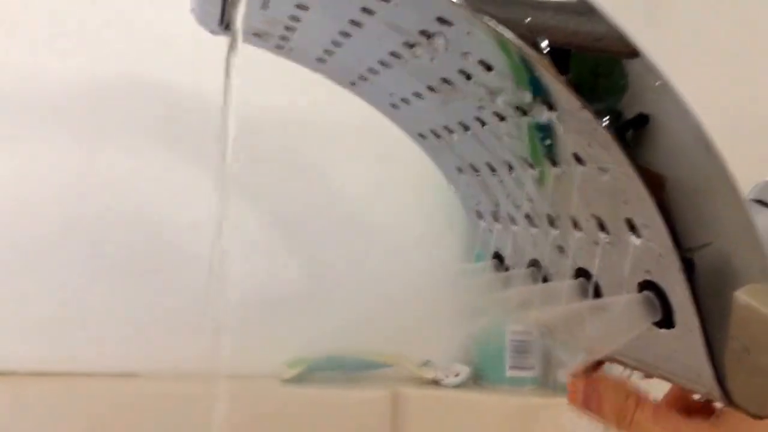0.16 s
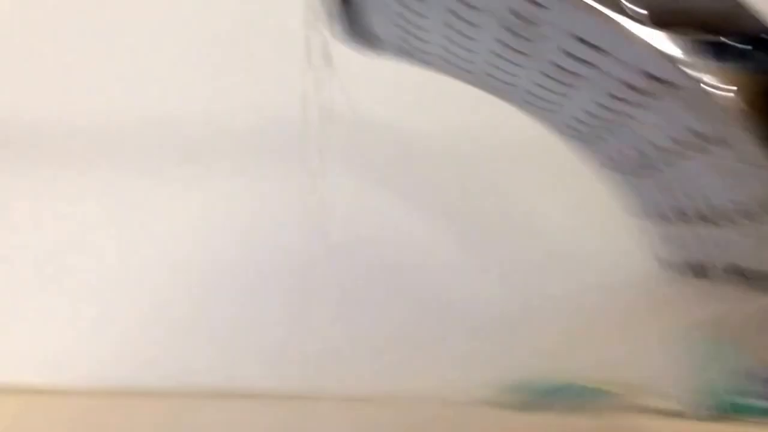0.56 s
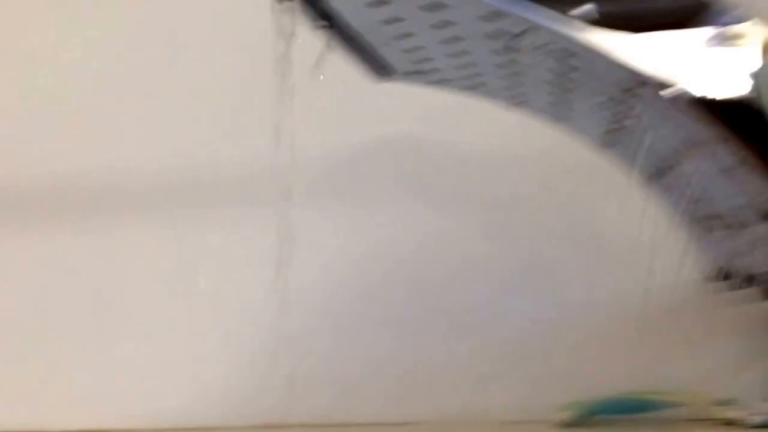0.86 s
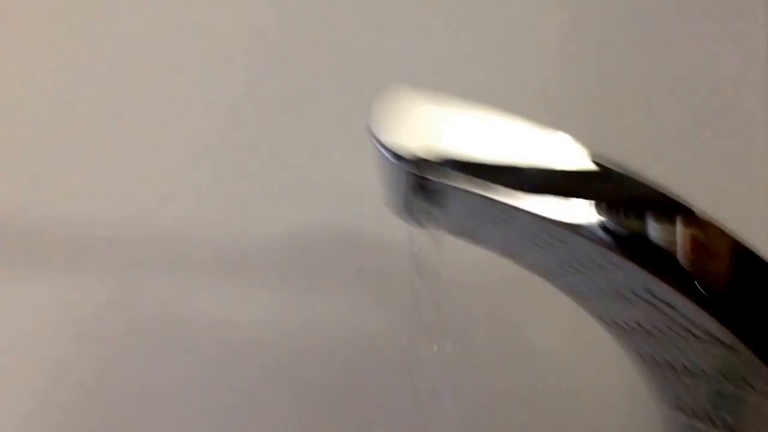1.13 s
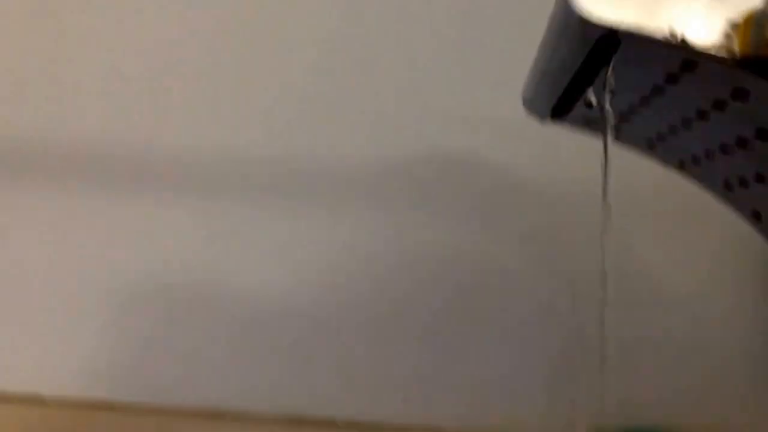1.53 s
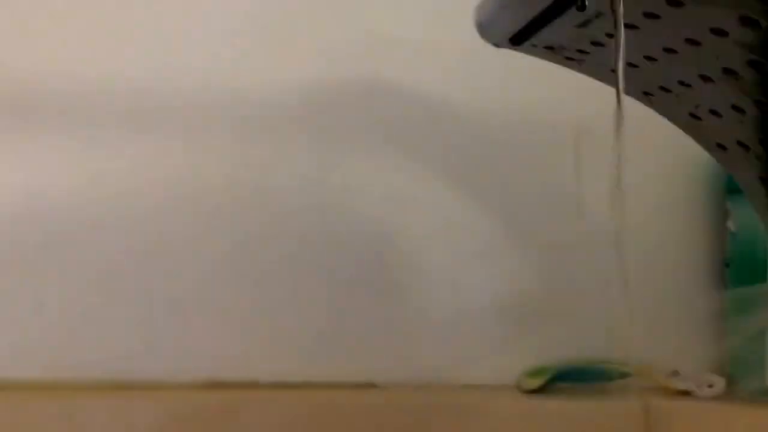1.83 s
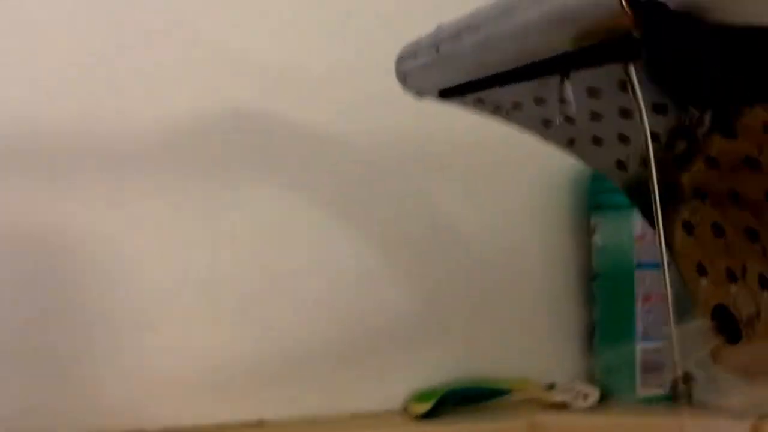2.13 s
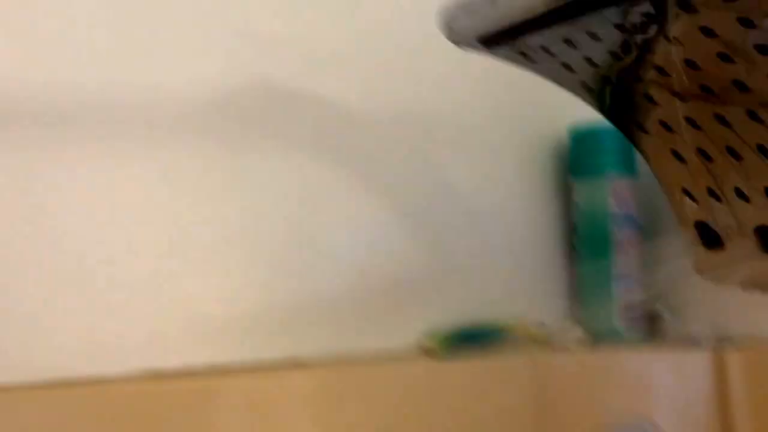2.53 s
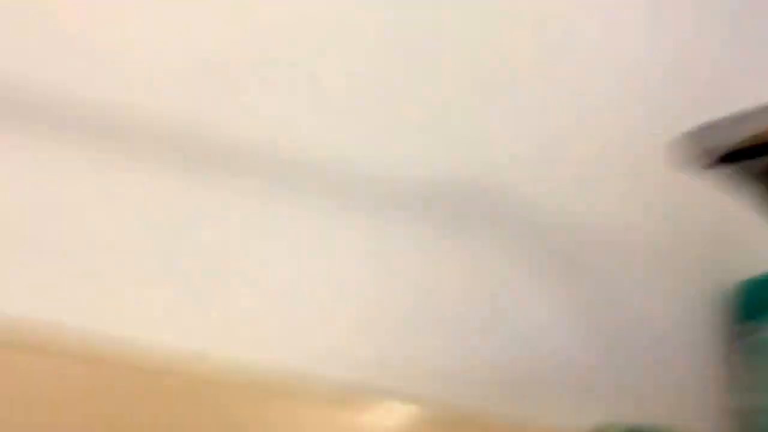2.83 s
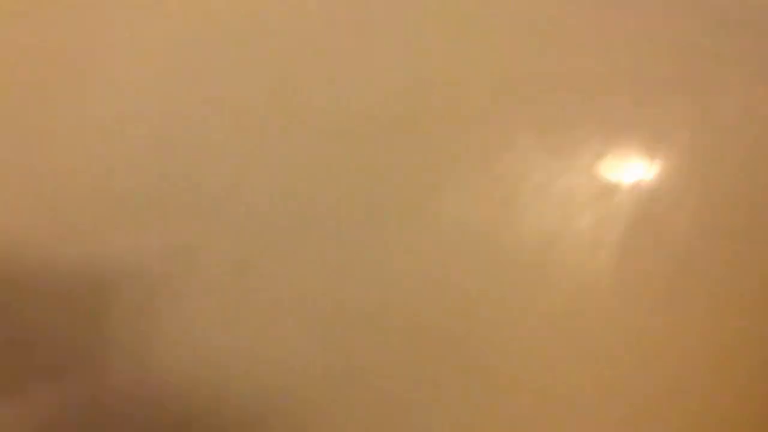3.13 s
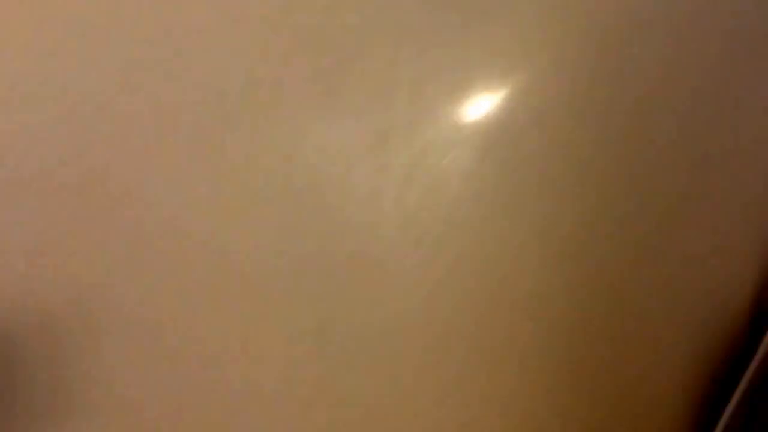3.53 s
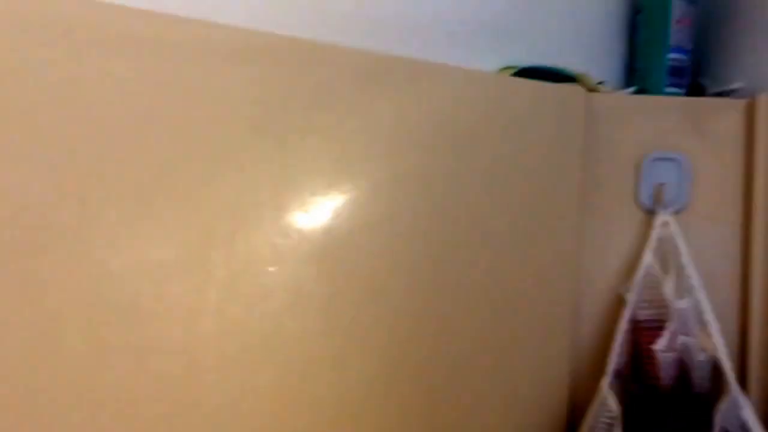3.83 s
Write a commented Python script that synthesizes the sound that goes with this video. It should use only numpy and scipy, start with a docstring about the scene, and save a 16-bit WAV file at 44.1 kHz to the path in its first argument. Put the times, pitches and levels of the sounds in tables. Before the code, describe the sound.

A shower sprays in a small tiled bathroom, hissing and pattering on a low drumming tub. Drops tick close by at first. The hiss shifts and gains a hollow whistle as the microphone moves, with a few soft handling bumps.

```python
"""A shower sprays in a small tiled bathroom: its jets sizzle and hiss, and the spray patters on the tub,
which drums low. At the start a few drops tick close by. The camera swings past the shower head, so the
sizzle changes colour, and after a second the hand bumps the camera softly twice. By two seconds a hollow
whistle has come out. Then more drops tick, the sizzle sinks as the camera swings away, the tub drums on
other notes, and two more soft bumps follow."""
import sys
import numpy as np
from scipy.fft import rfft, irfft, next_fast_len
from scipy.io import wavfile
from scipy.ndimage import map_coordinates

SR = 44100
rng = np.random.default_rng(int(sys.argv[2]) if len(sys.argv) > 2 else 0)


def store_pcm(level_fs):
    """Save levels as 16-bit WAV."""
    pcm = np.round(np.clip(level_fs, -1, 1) * 32767).astype(np.int16)
    wavfile.write(sys.argv[1], SR, np.atleast_2d(pcm).T)


N = 175518

# tone of the hiss near 9 kHz, in the jets and the close drops (frequency [Hz], relative level [dB])
HISS_TONE = [(5000, -35), (6800, -9), (7700, -3), (8600, 1), (9200, -0.5), (9900, -5.5), (11000, -2),
             (13500, -35)]


def amp(db):
    """Turn decibels into a gain."""
    return 10 ** (np.asarray(db) / 20)


def unit(x):
    """Scale a sound to an average (rms) size of 1."""
    return x / np.sqrt(np.mean(x ** 2) + 1e-20)


def curve(rows):
    """Join (time [s], value) points with straight lines, one value per sample."""
    return np.interp(np.arange(N) / SR, *np.transpose(rows))


def wobble(rate):
    """A smooth curve through `rate` random values a second."""
    points = rng.standard_normal(int(N * rate / SR) + 4)
    return map_coordinates(points, [np.arange(N) * rate / SR])


def filtered(x, response):
    """Multiply each frequency f in a sound by response(f)."""
    size = next_fast_len(N + SR // 4)
    return irfft(rfft(x, size) * response(np.fft.rfftfreq(size, 1 / SR)), size)[:N]


def coloured(x, tone):
    """Shape a sound by (frequency [Hz], level [dB]) points, then scale it to size 1."""
    hz, db = np.transpose(tone)
    return unit(filtered(x, lambda f: amp(np.interp(np.log(f + 1), np.log(hz + 1), db))))


def resonance(f, hz, half_width):
    """How a thing that rings at hz answers frequency f; squaring or cubing narrows the peak."""
    damping = 2j * f * half_width
    return damping / (hz * hz - f * f + damping)


def droplets(per_s, scatter_db, wash_db):
    """Tiny hits of random size over a wash of countless smaller ones."""
    hits = (rng.random(N) < per_s / SR) * np.sign(rng.standard_normal(N))
    sizes = amp(scatter_db * np.clip(rng.standard_normal(N), -2, 2))
    return unit(unit(hits * sizes) + amp(wash_db) * rng.standard_normal(N))


def wall_echoes(x):
    """Eight weak wall echoes colour the sound; their delays drift as the microphone moves."""
    echo_gain, drift_s = 0.11, 0.0003
    out = x.copy()
    for delay_s in rng.uniform(0.002, 0.012, size=8):
        lag = SR * (delay_s + drift_s * wobble(1))
        out += echo_gain * map_coordinates(x, [np.arange(N) - lag])
    return out * x.std() / out.std()


def hand_bumps():
    """The hand knocks the camera: low thuds that swell and fade smoothly."""
    # each bump (middle time [s], level [dB], fade time on either side [s])
    bumps = [(1.08, -44, .018), (1.32, -39, 0.036), (2.292, -58, 0.012), (3.059, -44, 0.016),
             (3.771, -38, 0.011)]
    thud_hz, t = 82, np.arange(N) / SR
    return sum(amp(db) * np.exp(-((t - s) / fade) ** 2) * np.sin(2 * np.pi * thud_hz * (t - s))
               for s, db, fade in bumps)


def tub_drum():
    """The tub drums under the spray; as the aim shifts twice, other notes take over."""
    # the tub's notes (pitch [Hz], filter half-width [Hz], first level [dB], middle [dB], last [dB])
    notes = [(82, 28, -60, -58, -64), (118, 36, -51, -54, -59), (167.5, 31, -56, -68, -53),
             (228, 18.6, -56.5, -55.5, -49), (300.4, 17, -58, -66, -54), (364.7, 25, -55.5, -58.5, -58)]
    drum = np.zeros(N)
    for hz, half_width, first_db, mid_db, last_db in notes:
        note = unit(filtered(rng.standard_normal(N), lambda f: resonance(f, hz, half_width) ** 2))
        drum += note * amp(curve([(1.3, first_db), (2.4, mid_db), (2.93, mid_db), (3, last_db)]))
    return drum


def hollow_whistle():
    """A narrow band of noise at the low end of the sizzle comes out as the shower head turns."""
    # how the whistle grows (time [s], level [dB])
    level = [(0, -64), (.6, -60), (1.1, -52), (1.8, -51), (2.15, -44.5), (2.8, -44), (3.3, -44.5),
             (3.98, -42.5)]
    ring = filtered(rng.standard_normal(N), lambda f: resonance(f, hz=3127, half_width=195) ** 3)
    return unit(ring) * amp(curve(level))


def patter():
    """The spray splashes on tub and wall and keeps the wall and fittings ringing."""
    # strength of the splash (time [s], level [dB]) and its tone (frequency [Hz], relative level [dB])
    level, splash_tone = [(0.0, -38.5), (0.12, -43), (1.07, -40.5), (1.92, -41.5), (2.26, -39.5),
                          (2.87, -40.5), (3.98, -41.5)], [(25, -32), (70, -0.5), (200, -4), (400, -2), (540, -4), (720, -3),
                                          (800, -6), (950, 1.5), (1080, -3), (1450, 1.5), (2300, 0),
                                          (2750, -2.5), (4000, -7.5), (9000, -27)]
    # notes of the wall and fittings (base pitch [Hz], filter half-width [Hz], relative level [dB])
    notes = [(713, 23, -7), (982.5, 33, -0.5), (1164.5, 37, 3.5), (1525, 94, -5), (1921, 150, 1)]
    # how their pitch moves with the spray (time [s], pitch [ratio])
    bend = [(0, 1.016), (1.1, 1), (1.6, 1.01), (2.3, 1.01), (3, 1.005), (3.98, 1.01)]
    # their strength next to the splash (time [s], relative level [dB])
    ring_level = [(0, -5), (1, -3.5), (1.6, -4), (2.2, -2), (2.9, -7), (3.98, -9)]
    splash = coloured(droplets(per_s=1200, scatter_db=3, wash_db=6), splash_tone)
    hits = droplets(per_s=900, scatter_db=8.5, wash_db=4)
    rings = filtered(hits, lambda f: sum(amp(db) * resonance(f, hz, half) ** 2 for hz, half, db in notes))
    rings = map_coordinates(rings, [np.cumsum(curve(bend))], mode="mirror")  # faster sounds higher
    return amp(curve(level)) * (splash + amp(curve(ring_level)) * unit(rings))


def near_drops():
    """Each drop close to the microphone gives a sharp tick and a brief spatter."""
    # each drop (time [s], peak level of its tick [dB])
    drops = [(.049, -4.5), (.079, -11), (.0985, -5), (.1645, -6), (0.18, -6), (0.181, -8.5), (0.189, -9),
             (0.2065, -9), (0.831, -7), (2.5874, -10), (2.588, -15), (2.59, -14), (2.6005, -17)]
    tick_hz, tick_decay_s = 9600, 0.000064
    spatter_db, spatter_decay_s = -16, 0.0043
    out, t = np.zeros(N + SR), np.arange(SR // 20) / SR
    hiss = coloured(rng.standard_normal(N), HISS_TONE)
    for time_s, db in drops:
        start = round(time_s * SR)
        span = slice(start, start + len(t))
        hz = tick_hz * np.exp(0.086 * rng.standard_normal())
        tick = np.cos(2 * np.pi * hz * t) * np.exp(-t / tick_decay_s)
        tick = np.diff(tick, prepend=0)  # thins out the bass
        spatter = amp(spatter_db) * hiss[span] * np.exp(-t / spatter_decay_s)
        out[span] += amp(db) * (tick / np.abs(tick).max() + spatter)
    return out[:N]


def jets():
    """The jets break into droplets; all bands flutter with the flow, and each a little by itself."""
    # how far the shower head has turned from the microphone (time [s], share [0-1])
    turning = [(0, 0.25), (.5, 0.06), (.9, .4), (1.5, 0.57), (2.1, 0.97), (2.7, .85), (3.3, 0.94),
               (3.98, 1)]
    # strength of the sizzle and the bands above it, low to high (time [s], relative level [dB])
    sizzle_level, edge_level, hiss_level = [(0, -31), (.42, -30.5), (1, -30.5), (1.3, -30), (2, -29.5),
                                            (2.45, -29), (2.72, -33), (3.1, -34.5), (3.35, -36),
                                            (3.65, -36), (3.98, -35.3)], [(0.0, -38.5), (0.65, -44), (0.85, -37),
                                                            (1.44, -43), (1.63, -34), (2.49, -34),
                                                            (2.8, -40), (2.9, -36), (3.6, -43), (3.76, -33),
                                                            (3.89, -38), (3.98, -35)], [(0.0, -28), (0.2, -31),
                                                                          (0.22, -30.5), (0.82, -29.5),
                                                                          (1.31, -32), (1.51, -29.5),
                                                                          (1.65, -36), (1.71, -33),
                                                                          (2.56, -40.5), (2.59, -36),
                                                                          (2.64, -40), (3.59, -37),
                                                                          (3.7, -48), (3.98, -48)]
    fizz_level, air_level = [(0.0, -31), (0.09, -30), (1.0, -29.5), (1.11, -32.5), (2.05, -30.5),
                             (2.36, -32.5), (2.57, -28.5), (2.83, -34), (3.6, -30), (3.98, -32.5)], [(0.0, -37), (0.02, -32), (0.49, -32), (0.68, -40), (2.58, -30.5),
                                           (2.64, -33.5), (3.23, -34.5), (3.47, -29.5), (3.98, -31.5)]
    # tone of the sizzle from the front and from behind (frequency [Hz], relative level [dB])
    front_tone, behind_tone = [(2900, -47), (3250, -18), (3500, -5.5), (3950, -1.5), (4500, 0),
                               (5100, -0.5), (5700, -4), (6700, -16.5), (8000, -22), (10000, -48)], [(2850, -43), (3050, -14), (3250, -3.5), (3600, -4.5),
                                                     (4200, -1.5), (4850, 1.5), (5400, -1), (6000, -6),
                                                     (7000, -10.5), (10000, -43)]
    # tone of the bands near 6, 12 and 14 kHz (frequency [Hz], relative level [dB])
    edge_tone, fizz_tone, air_tone = [(4900, -36), (5500, -3.5), (5950, 4.5), (6400, 0.5), (6850, -3),
                                      (7300, -8.5), (8500, -25)], [(7500, -19.5), (9800, -7), (11000, -4),
                                                             (12000, 1.5), (13100, -1), (14000, -8),
                                                             (15500, -20)], [(11000, -30),
                                                                                    (12800, -10),
                                                                                    (13800, 2), (14700, 2),
                                                                                    (15400, -1)]
    flutter_per_s, sizzle_db = 40, 0.73
    turn = np.clip(curve(turning), 0, 1)
    front = coloured(droplets(per_s=3000, scatter_db=2.5, wash_db=2), front_tone)
    behind = coloured(droplets(per_s=3000, scatter_db=1.5, wash_db=4.5), behind_tone)
    sizzle = np.sqrt(1 - turn) * front + np.sqrt(turn) * behind
    sizzle *= amp(curve(sizzle_level) + sizzle_db + 0.61 * wobble(flutter_per_s))
    spray = droplets(per_s=2500, scatter_db=5, wash_db=0.5)
    treble = np.zeros(N)
    for level, tone, gain_db in [(edge_level, edge_tone, -1.5), (hiss_level, HISS_TONE, -0.5),
                                 (fizz_level, fizz_tone, -0.14), (air_level, air_tone, 1.5)]:
        band = coloured(spray + amp(2.5) * rng.standard_normal(N), tone)
        treble += band * amp(curve(level) + gain_db + 0.66 * wobble(flutter_per_s))
    return (sizzle + treble) * amp(0.11 * wobble(flutter_per_s))


def scene():
    """Water in the tiled room and the hand on the camera, the same in both channels."""
    shower = wall_echoes(jets() + hollow_whistle() + patter())
    mono = shower + tub_drum() + near_drops() + hand_bumps()
    return np.array([mono, mono])


def record(dry):
    """The very highest treble is cut off."""
    top_hz = 15380
    return np.array([filtered(channel, lambda hz: hz < top_hz) for channel in dry])


dry = scene()
out = record(dry)
store_pcm(out)
```